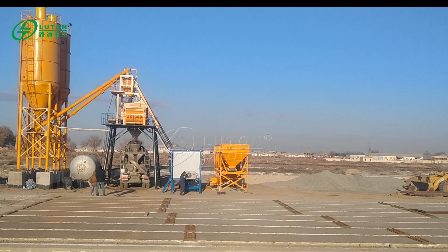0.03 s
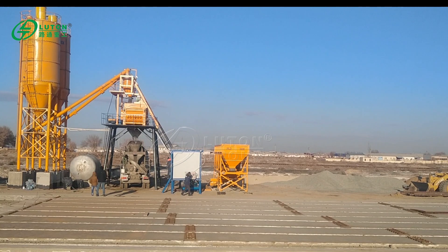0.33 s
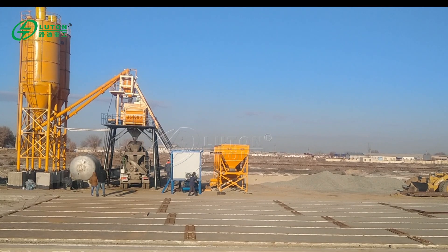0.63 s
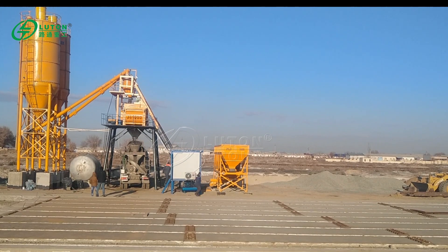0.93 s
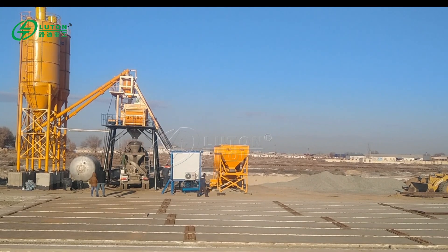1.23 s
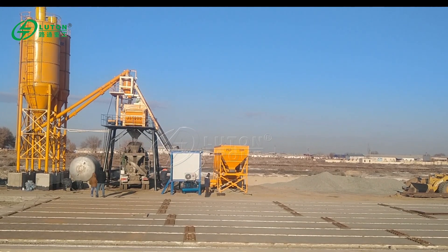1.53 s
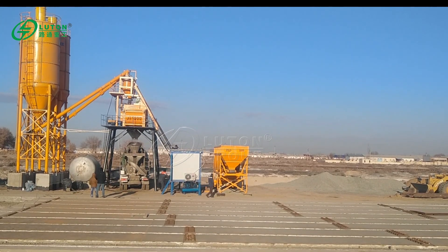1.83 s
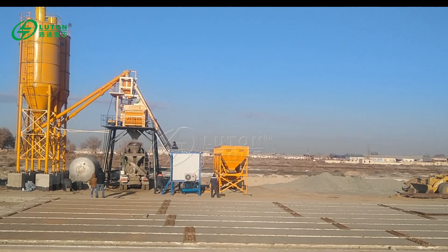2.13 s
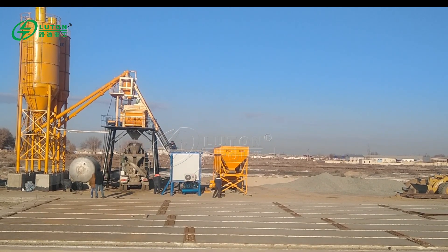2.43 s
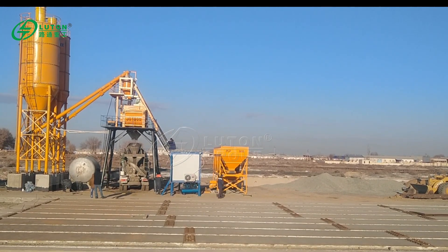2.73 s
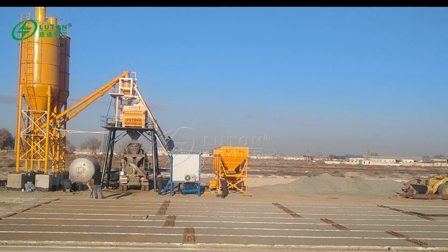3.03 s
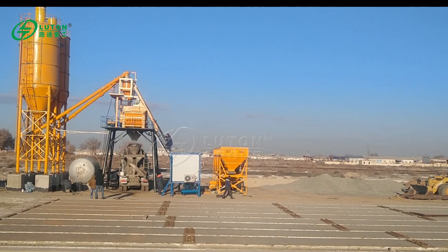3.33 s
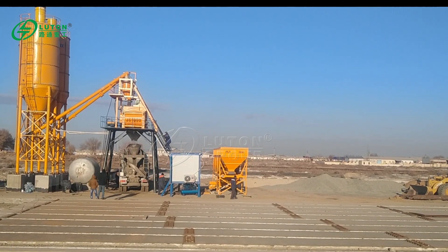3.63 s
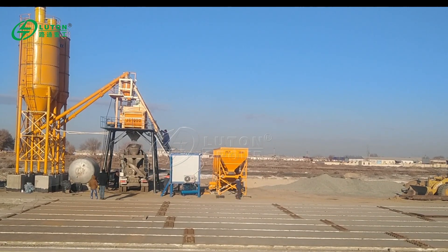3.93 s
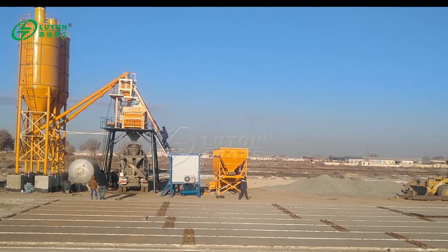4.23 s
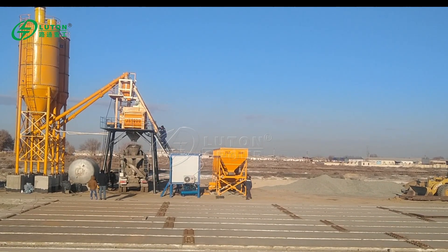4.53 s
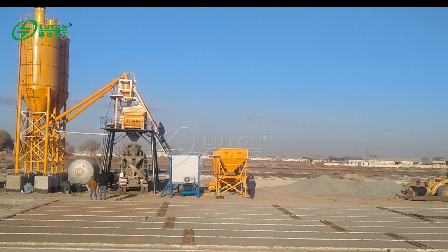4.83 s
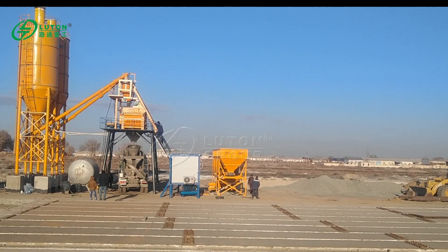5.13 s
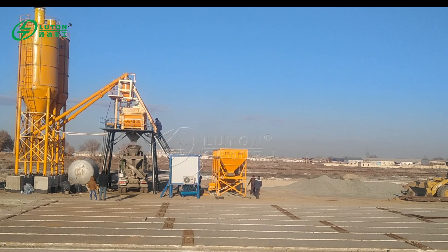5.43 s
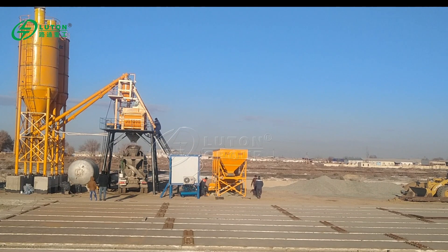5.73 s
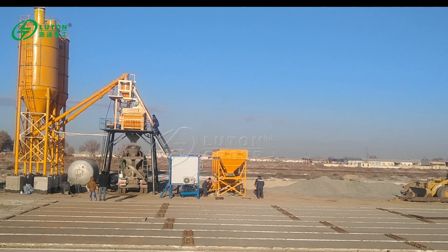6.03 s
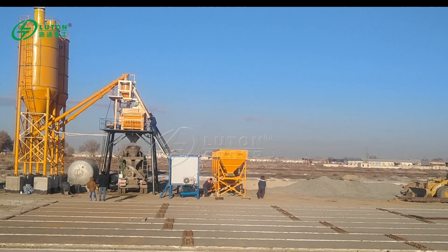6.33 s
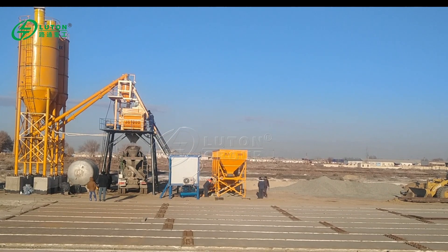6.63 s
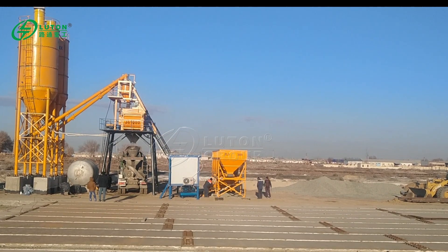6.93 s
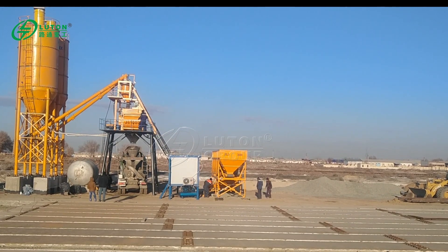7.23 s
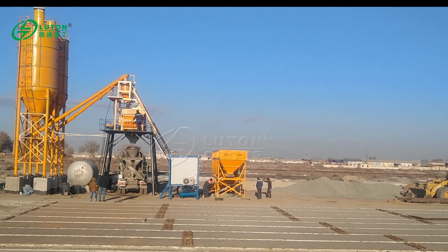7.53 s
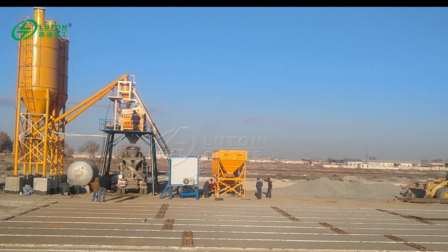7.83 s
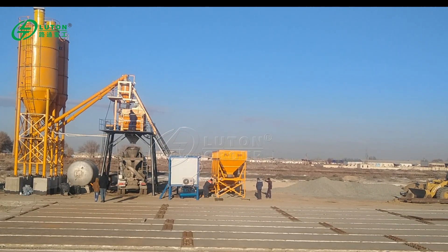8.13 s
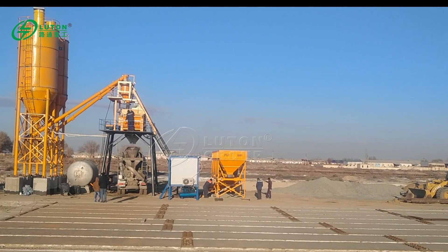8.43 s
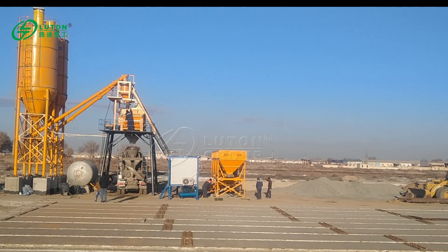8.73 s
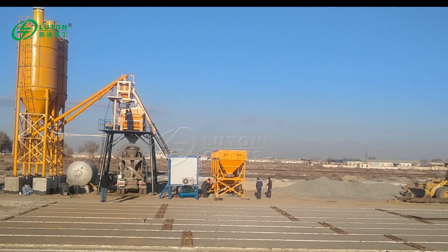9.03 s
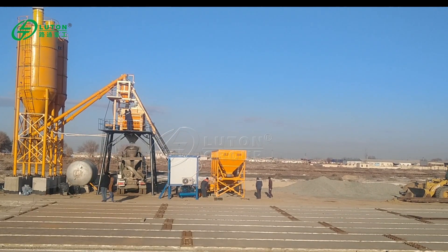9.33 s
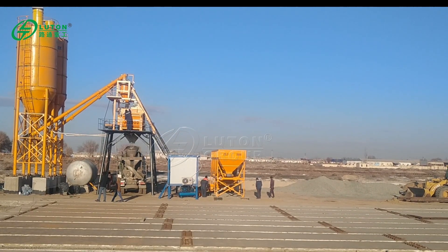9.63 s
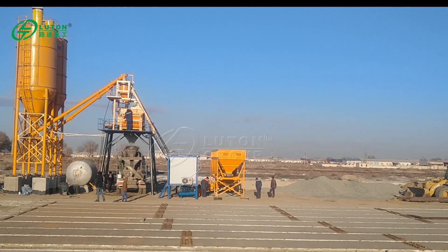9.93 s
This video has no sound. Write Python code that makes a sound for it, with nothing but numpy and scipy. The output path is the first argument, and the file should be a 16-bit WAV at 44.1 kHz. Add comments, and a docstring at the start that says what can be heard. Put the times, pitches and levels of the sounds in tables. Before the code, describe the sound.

Gravel rushes into a steel hopper at an outdoor concrete plant, hissing and rattling as larger stones crack against the plates. It stops briefly, leaving a faint motor whine. A second, brighter pour follows and thins to a ringing, scraping trickle before shutting off. Faint machine whines and a drone remain. Wind rumbles and thumps on the microphone throughout, mostly on the right.

```python
"""Gravel rushes down into a steel hopper twice, at a concrete batching plant across an open yard.
Thousands of tiny impacts take on the hollow ring of the plates, and larger stones crack through.
The second pour thins to a trickle that keeps the hopper ringing and scrapes in surges.
Behind it, electric drives and rubbing parts whine faintly. Gusts buffet the microphone,
their eddies rumbling and thumping hardest on the exposed right port."""
import sys
import numpy as np
from scipy import signal
from scipy.fft import rfft, irfft, next_fast_len
from scipy.io import wavfile
from scipy.ndimage import uniform_filter1d

SR = 44100
rng = np.random.default_rng(int(sys.argv[2]) if len(sys.argv) > 2 else 0)


def pcm_store(signal):
    """Save signal as 16-bit PCM."""
    levels = np.round(np.clip(np.atleast_2d(signal), -1, 1) * 32767)
    wavfile.write(sys.argv[1], SR, levels.astype(np.int16).T)


N = 439677
T = np.arange(N) / SR
FFT_SIZE = next_fast_len(N)
HZ = np.maximum(np.arange(FFT_SIZE // 2 + 1) * SR / FFT_SIZE, 1)

# Colour of the distant yard. Each row: frequency in Hz, left and right in dB.
YARD_COLOUR = [(40, -12.5, -2), (200, 6.5, -9.5), (550, 7.5, -35.5), (1100, -2.5, -43), (1700, -7, -1),
               (3000, -8.5, -9), (5470, -20, -7), (9000, -18, -38), (13500, -16.5, -34),
               (15500, -44.5, -41)]
# Motor tones. Each row: start and end in seconds, pitch in Hz, left and right in dB.
MOTOR_TONES = [(0, 2.6, 2616, -64, -86), (1.6, 2.65, 3688, -53, -81.5), (8.45, 10.1, 3494, -48.5, -87.5),
               (8.7, 10.1, 3445, -54.5, -85), (9.5, 10.1, 4620, -71, -65)]
# Machine whines and squeals, and a single row for the drone under them.
# Each row: start and end in seconds, centre and width in Hz, left and right in dB.
WHINE_BANDS = [(1.6, 2.7, 3440, 80, -56, -78), (1.6, 2.7, 3245, 60, -60, -80),
               (1.6, 2.7, 2330, 150, -66, -64), (1.6, 2.65, 4660, 110, -61, -65),
               (1.6, 2.48, 5215, 80, -68, -76), (1.6, 2.65, 3780, 220, -57, -70),
               (6.56, 6.65, 640, 50, -54, -56), (8.735, 8.772, 1225, 130, -58, -47),
               (8.3, 9.03, 4620, 50, -60.5, -67), (8.45, 10.1, 3410, 140, -60, -80),
               (8.35, 9.75, 3680, 120, -61, -80), (9.19, 9.65, 2620, 36, -65, -82),
               (9.62, 9.88, 3990, 45, -65, -78), (8.45, 9.8, 4870, 75, -68, -76),
               (9.08, 10.1, 982, 62, -47, -43), (9.05, 10.1, 1466, 60, -75, -65),
               (8.4, 10.1, 2325, 130, -75, -69)]
DRONE_BAND = (8.98, 10.1, 760, 210, -58, -47.5)

# Wind strength on the left and right ports. Each row: time in seconds, level in dB.
SHELTERED_BREEZE = [(0.0, -31.5), (0.18, -25), (0.4, -43), (0.95, -23), (1.2, -37), (1.74, -30),
                    (2.05, -67), (2.73, -30), (3.5, -31), (3.7, -55), (4.95, -38), (5.3, -62), (6.55, -60),
                    (6.86, -29.5), (7.48, -23.5), (8.12, -40), (8.35, -57), (8.84, -40.5), (9.94, -29)]
EXPOSED_BREEZE = [(0.0, -26), (0.1, -15), (1.49, -13.5), (1.71, -18), (2.65, -17), (2.92, -11),
                  (3.33, -16.5), (3.43, -12.5), (3.91, -21), (4.59, -16.5), (4.98, -17.5), (5.35, -25.5),
                  (6.46, -26.5), (6.8, -23), (7.46, -21), (7.91, -16.5), (8.27, -19), (8.31, -25.5),
                  (8.71, -23.5), (8.74, -13.5), (9.94, -13.5)]
# Colours of the wind's layers. Each row: frequency in Hz, relative level in dB.
SHELTERED_COLOUR = [(20, -33.5), (50, -7.5), (135, 2.5), (210, -0.5), (300, -11), (420, -18), (600, -37.5),
                    (1000, -64.5)]
EXPOSED_COLOUR = [(20, -38), (50, -23), (90, -13.5), (130, 0.5), (165, 0), (205, -3), (250, -6.5),
                  (340, -13), (450, -38.5), (700, -85.5)]
FLUTTER_COLOUR = [(200, -19), (380, 2.5), (500, -3.5), (650, -13), (800, -26), (1000, -33), (1400, -38.5),
                  (2200, -72.5)]
DRAUGHT_COLOUR = [(20, -18), (70, 4.5), (120, 6.5), (300, -68.5)]
# Thumps of wind. Each row: time and half length in seconds, left, right and extra flutter in dB.
WIND_BUFFETS = [(0.21, 0.018, -40, -24, -1), (0.926, 0.045, -35, -13, -2), (1.273, 0.017, -47, -5, 4),
                (2.215, 0.03, -50.5, -11.5, -1), (2.536, 0.056, -50, -15, 1.5), (3.836, 0.1, -55, -25, 6),
                (3.94, 0.17, -40, -31, 6), (4.364, 0.13, -50, -17.5, 4.5), (5.714, 0.037, -58, -21, -2),
                (6.341, 0.056, -28, -26, 0), (6.924, 0.074, -24.5, -19.5, 6), (7.234, 0.36, -44, -18.5, -8),
                (7.713, 0.037, -29, -11.5, 0), (7.892, 0.042, -43, -10, 0), (8.02, 0.061, -21, -13, 0.5),
                (8.536, 0.063, -24, -18, -4), (8.85, 0.061, -41, -14, 3), (9.028, 0.078, -31.5, -14, 5)]
# Brief holes in the wind. Each row: time and half length in seconds, dip in dB.
WIND_LULLS = [(1.1, 0.071, -6.5), (1.33, 0.08, -6.5), (3.31, 0.029, -9), (6.08, 0.039, -5.5),
              (6.42, 0.14, -10.5), (6.83, 0.019, -18), (7.1, 0.022, -26), (7.33, 0.029, -8.5),
              (7.44, 0.024, -9.5)]
# The hardest eddies to slap the exposed port. Each row: time in seconds, strength in dB.
EDDY_SLAPS = [(2.091, 2.5), (2.178, 2), (2.493, 3.5), (2.545, 5.5), (4.598, 7.5), (8.745, 7), (8.905, 9.5),
              (9.516, 11.5), (9.715, 7.5)]
# Booming vortices. Each row: time and half length in seconds, pitch in Hz, relative level in dB.
VORTEX_BOOMS = [(0.392, 0.079, 162, -15), (0.689, 0.019, 162.5, -10), (1.184, 0.023, 173.8, -8.5),
                (1.443, 0.038, 159, -10.5), (2.836, 0.062, 187, -11), (2.991, 0.051, 167.8, -8.5),
                (4.056, 0.042, 147.5, -13.5), (7.908, 0.034, 161.3, -13.5), (8.846, .04, 194.4, -10),
                (9.074, 0.046, 140.3, -11.5), (9.38, 0.079, 151, -13), (9.57, 0.057, 169.4, -14.5),
                (9.774, 0.072, 140, -12)]
# Deep thuds in the draught. Each row: time in seconds, boost in dB.
DRAUGHT_THUDS = [(.44, 8), (.8, 12), (1.85, 11), (2.34, 7), (4.5, 10.5), (4.98, 11.5), (7.68, 13),
                 (8.02, 7)]

# Scraping surges, stray handfuls and large stones. Each row: time in seconds, relative level in dB.
SCRAPE_SURGES = [(4.51, -49), (4.86, -52), (5.38, -61), (5.55, -66), (5.71, -55), (5.99, -60), (6.18, -61),
                 (6.77, -74), (6.93, -59), (7.33, -59), (7.59, -54), (7.9, -54), (8.03, -55)]
HANDFULS = [(1.755, -35.5), (1.85, -44), (1.93, -46), (2.662, -39.5)]
STONE_HITS = [(.255, -34), (0.432, -30), (.734, -29.5), (0.929, -29), (1.512, -34), (2.712, -33),
              (4.147, -28), (4.5, -32), (4.645, -34), (4.834, -35), (4.939, -32.5), (5.429, -34)]
# Resonances woken by the scrapes, the handfuls and the trickle.
# Each row: centre and width in Hz, left and right in dB.
SCRAPE_RESONANCES = [(1034, 100, 2.5, 4.5), (1394, 45, -20.5, -5), (1690, 81, -23, -10)]
RATTLE_RESONANCES = [(1150, 380, -20, -16.5), (1990, 100, -15, -0.5), (2370, 240, -1.5, -3.5)]
WALL_RESONANCES = [(2065, 72, -49.5, -49), (2123, 38, -52, -47), (2323, 160, -56.5, -55),
                   (2760, 810, -51.5, -81.5), (3366, 360, -42, -61.5), (3676, 300, -46, -69),
                   (4790, 1220, -52.5, -54.5), (7280, 1400, -47, -49.5), (8240, 1800, -48.5, -57),
                   (10400, 4100, -58, -58)]
# The sharpest modes of the steel. Each row: pitch in Hz, relative level in dB.
SINGING_MODES = [(2616, -61), (3365, -53), (3494, -51.5), (3692, -52), (4194, -62.5), (4613, -61),
                 (4689, -61)]
# Colours of the two pours. Each row: frequency in Hz, left and right in dB.
FIRST_POUR_COLOUR = [(300, -34.5, -8.5), (600, -27.5, -6.5), (1050, -6, -6.5), (1390, -9.5, -10.5),
                     (1700, -15, -9.5), (2370, -6, -4.5), (2750, -17, -19.5), (3490, -2.5, -17.5),
                     (4240, -14, -13.5), (6950, -25.5, -21), (7860, -16.5, -18.5), (11600, -28, -29),
                     (12500, -28, -35), (15000, -50.5, -51.5)]
SECOND_POUR_COLOUR = [(300, -24.5, -35.5), (640, -22, -3.5), (1043, -4.5, -4), (1650, -11, -5),
                      (2280, 0.5, 1.5), (2840, -4.5, -7.5), (3480, 7, -6.5), (3900, -3, -4.5),
                      (5700, -9.5, -11.5), (7350, -1, -4), (9600, -14, -13), (12300, -12.5, -17.5),
                      (13950, -17.5, -23.5), (15300, -28.5, -78)]
# Clumps that swell or choke a pour. Each row: time and half length in seconds, boost or dip in dB.
FLOW_CLUMPS = [(.03, 0.15, -3.5), (.24, 0.097, 1), (.365, 0.045, -5.5), (.95, 0.033, 0.5),
               (1.12, 0.067, -5.5), (1.53, 0.076, 1.5), (1.725, 0.012, -9), (2.95, 0.062, 4.5),
               (4.22, 0.035, 6.5), (5.17, .16, -4)]

# The second pour: its gate, the level it thins towards and its fade once shut off.
GATE_OPEN_S, GATE_SHUT_S = 2.662, 8.28
TRICKLE_DB, SHUT_DB_PER_S = -63, 114


def from_db(db):
    """Decibels to gain."""
    return 10 ** (np.asarray(db) / 20)


def stereo_gain(left_db, right_db):
    """One gain for each ear."""
    return from_db([[left_db], [right_db]])


def unit_power(x):
    """Scale to an RMS of 1."""
    return x / np.sqrt(np.mean(x ** 2) + 1e-20)


def since(s):
    """Seconds gone by since a moment; zero before it."""
    return np.maximum(T - s, 0)


def between(start, end):
    """A soft gate from start to end; short sounds get quicker fades."""
    fade_s = min((end - start) / 2, .15)
    return np.clip(np.minimum(T - start, end - T) / fade_s + .5, 0, 1)


def bump(s, half_length_s):
    """A smooth swell of height 1 around a moment."""
    return np.exp(-np.minimum(((T - s) / half_length_s) ** 2, 50))


def swells(rows):
    """Gain that briefly rises or sinks at each (s, half length s, dB)."""
    return from_db(sum(db * bump(s, length) for s, length, db in rows))


def fader(rows):
    """Gain that rides through (s, dB) points."""
    times, levels_db = np.transpose(rows)
    return from_db(np.interp(T, times, levels_db))


def blows(rows):
    """One click for each (s, dB)."""
    clicks = np.zeros(N)
    for s, db in rows:
        clicks[round(s * SR)] = from_db(db)
    return clicks


def decay(clicks, t60):
    """Each click starts an envelope that falls 60 dB in t60 seconds."""
    return signal.lfilter([1], [1, -from_db(-60 / (t60 * SR))], clicks + 1e-18)


def drift(rate_hz):
    """Smooth random modulation with a spread of 1."""
    hop, warm_up = 40, 2000
    pole = np.exp(-2 * np.pi * rate_hz * hop / SR)
    noise = rng.standard_normal(N // hop + warm_up + 2)
    slow = signal.lfilter([1], [1, -2 * pole, pole * pole], noise)[warm_up:]
    return np.interp(np.arange(N) / hop, np.arange(len(slow)), unit_power(slow))


def cut(x, order, hz, kind):
    """A Butterworth low-pass or high-pass."""
    return signal.sosfilt(signal.butter(order, hz, kind, fs=SR, output="sos"), x)


def equalise(x, gain):
    """Apply a gain for each frequency in HZ."""
    return irfft(rfft(x, FFT_SIZE) * gain, FFT_SIZE)[:, :N]


def coloured(x, colour):
    """Shape x with an EQ curve (one dB column, or one per ear); unit power."""
    hz, *columns = np.transpose(colour)
    gain = from_db([np.interp(np.log(HZ), np.log(hz), db) for db in columns])
    return unit_power(equalise(x, gain))


def resonate(x, modes):
    """Pass a white stereo drive through steep-sided resonances, each with its level in each ear."""
    power = 0
    for hz, width, left_db, right_db in modes:
        shape = unit_power((1 + 2 * ((HZ - hz) / width) ** 2) ** -1.5)
        power = power + (stereo_gain(left_db, right_db) * shape) ** 2
    return equalise(x, np.sqrt(power))


def grains(per_s, spread_db=0.0):
    """Random impacts, unrelated in strength and sign at each ear; spread_db makes them more uneven."""
    hits = rng.random(N) < per_s / SR
    sizes = from_db(spread_db * np.minimum(rng.exponential(1, N), 5))
    return unit_power(hits * sizes * rng.standard_normal((2, N)))


def yard(level_db=-66.5):
    """The distant yard lays a faint, steady bed of noise."""
    return from_db(level_db) * coloured(rng.standard_normal((2, N)), YARD_COLOUR)


def drives(waver_hz=4.0, fading_db=1.0):
    """Electric motors sing steady tones that waver slightly together; a close pair beats in a buzz."""
    out, detune_hz = 0, waver_hz * drift(11)
    for start, end, hz, left_db, right_db in MOTOR_TONES:
        phase = 2 * np.pi * np.cumsum(hz + detune_hz) / SR
        gain = stereo_gain(left_db, right_db) * from_db(-fading_db * drift(3.1))
        out = out + between(start, end) * gain * np.sqrt(2) * np.sin(phase)
    return out


def whines(waver_db=3.5, drone_waver_db=2.0, grating_db=2.0):
    """Rubbing parts ring in narrow bands that grate as they catch and slip; a broad drone joins late."""
    friction = rng.standard_normal((2, N))
    bands = sum(between(start, end) * resonate(friction, [mode]) * from_db(waver_db * drift(15))
                for start, end, *mode in WHINE_BANDS)
    grating = unit_power(from_db(grating_db * drift(70)))
    start, end, *mode = DRONE_BAND
    drone = between(start, end) * resonate(friction, [mode]) * from_db(drone_waver_db * drift(4.6))
    return bands * grating + drone


def wind_strength(left_gusty_db=1.0, right_gusty_db=1.8):
    """The breeze on each port, with quick random gusting, single buffets and lulls."""
    breeze = np.array([fader(SHELTERED_BREEZE) * from_db(left_gusty_db * drift(6.3)),
                       fader(EXPOSED_BREEZE) * from_db(right_gusty_db * drift(16))])
    buffet_power = sum((stereo_gain(left_db, right_db) * bump(s, length)) ** 2
                       for s, length, left_db, right_db, _ in WIND_BUFFETS)
    return np.sqrt(breeze ** 2 + buffet_power) * swells(WIND_LULLS)


def eddies(colour, evenness, lumpy_db):
    """Turbulence on one port: a rumble, compressed by evenness (0 to 1) and broken into quick lumps."""
    rumble = coloured(rng.standard_normal(N), colour)[0]
    envelope = np.sqrt(np.abs(uniform_filter1d(rumble ** 2, size=3000)) + 1e-9)
    return unit_power(rumble / envelope ** evenness * from_db(lumpy_db * drift(29)))


def slaps(lesser_per_s=7.6, lesser_db=-4, t60=0.024):
    """Gain that jumps as an eddy slaps the port and falls straight back; lesser slaps come at random."""
    lesser = from_db(lesser_db) * (rng.random(N) < lesser_per_s / SR) * rng.random(N)
    return 1 + decay(blows(EDDY_SLAPS) + lesser, t60)


def flutter(strength, level_db=-15, onset_db=-19, steepness=2.4, top_hz=830):
    """Strong gusts flap in the low mids; below the onset strength the flapping drops away steeply."""
    onset = np.minimum(strength / from_db(onset_db), 1) ** steepness
    accents = swells([(s, length, extra_db) for s, length, _, _, extra_db in WIND_BUFFETS])
    flapping = slaps() * eddies(FLUTTER_COLOUR, evenness=0.43, lumpy_db=1.5)
    return strength * from_db(level_db) * onset * accents * unit_power(cut(flapping, 9, top_hz, "low"))


def draught(level_db=-30.5, thud_half_length_s=0.07):
    """A low stir of air that swells into deep thuds and sinks in the lulls."""
    thuds = swells([(s, thud_half_length_s, db) for s, db in DRAUGHT_THUDS])
    air = coloured(rng.standard_normal(N), DRAUGHT_COLOUR)[0]
    return from_db(level_db) * thuds * swells(WIND_LULLS) * air


def vortices(trim_db=-0.5, glide=0.05, rough_db=1.5):
    """Each vortex shed at the port is a short, nearly pure boom whose pitch wanders a little."""
    warped_s = np.cumsum(1 + glide * drift(8)) / SR
    booms = sum(from_db(db) * bump(s, length) * np.sin(2 * np.pi * hz * warped_s)
                for s, length, hz, db in VORTEX_BOOMS)
    return np.sqrt(2) * booms * from_db(trim_db + rough_db * drift(30))


def wind(right_trim_db=-1.0):
    """Each port rumbles with its own eddies; the exposed right one also flutters, thuds and booms."""
    sheltered, exposed = wind_strength()
    left = sheltered * eddies(SHELTERED_COLOUR, evenness=0.37, lumpy_db=2.5)
    right = exposed * eddies(EXPOSED_COLOUR, evenness=1.0, lumpy_db=2.0) * from_db(right_trim_db)
    return np.array([left, right + flutter(exposed) + draught() + vortices()])


def first_flow(start_db=-30, sag_db_per_s=3, close_s=1.585, fade_db_per_s2=122, surging_db=1.08):
    """Level of a clumpy stream that sags slowly, then falls ever faster as the gate closes."""
    closing_db = fade_db_per_s2 * np.minimum(since(close_s), 1) ** 2
    stream_db = start_db - sag_db_per_s * T - closing_db + surging_db * drift(23)
    return from_db(stream_db) * swells(FLOW_CLUMPS)


def second_flow(full_db=-27.5, full_until_s=3.61, thinning_s=1.4, opening_db=-24, swell_s=0.082,
                attack_s=0.011, leak_db=-55.5, leak_db_per_s=41):
    """Level of a stream that swells, holds and thins to a trickle until the gate shuts."""
    attack = np.minimum(since(GATE_OPEN_S) / attack_s, 1)
    swell_db = opening_db * np.exp(-since(GATE_OPEN_S) / swell_s)
    stream_db = TRICKLE_DB + (full_db - TRICKLE_DB) * np.exp(-since(full_until_s) / thinning_s)
    stream = attack * from_db(stream_db + swell_db - SHUT_DB_PER_S * since(GATE_SHUT_S))
    leak = from_db(leak_db - leak_db_per_s * np.abs(T - GATE_OPEN_S))  # stones slip past the moving gate
    return stream * swells(FLOW_CLUMPS) + leak


def ringing(level_db=-1, follow=0.11, build_s=0.16, dribble_db=-9, dribble_db_per_s=35):
    """Level of the steel's ring, far more even than the flow feeding it; a dribble outlasts the gate."""
    held_flow = np.interp(np.minimum(T, GATE_SHUT_S), T, second_flow()) / from_db(TRICKLE_DB)
    build = np.minimum(since(GATE_OPEN_S) / build_s, 1)
    shut_for_s = since(GATE_SHUT_S)
    release_db = np.maximum(-SHUT_DB_PER_S * shut_for_s, dribble_db - dribble_db_per_s * shut_for_s)
    return held_flow ** follow * build * from_db(level_db + release_db)


def steel(x, ripple_db=3.0, mode_width_hz=28):
    """The many close modes of the steel plates give what lands on them a fine, hollow ring."""
    heights = np.clip(rng.standard_normal(4000), -2, 2)
    ripple = np.interp(HZ / mode_width_hz, np.arange(len(heights)), heights)
    return equalise(x, unit_power(from_db(ripple_db * ripple)))


def scrapes(half_length_s=0.033, bed_db=-66, trim_db=-2.5, chatter_db=3.5, pitch_wander=0.04):
    """As the stream thins, gravel slides in short, chattering surges, each at a slightly new pitch."""
    surges = sum(from_db(db + trim_db) * bump(s, half_length_s) for s, db in SCRAPE_SURGES)
    friction = rng.standard_normal((2, N))
    rub = sum(resonate(friction, [mode]) * from_db(chatter_db * drift(9.2))
              for mode in SCRAPE_RESONANCES)
    warped_s = np.cumsum(1 + pitch_wander * drift(5)) / SR
    bent_rub = np.array([np.interp(warped_s, T, ear) for ear in rub])
    return (surges + from_db(bed_db) * ringing()) * bent_rub


def rattles(t60=0.44):
    """Between the pours, stray handfuls land as short, dying patters on the steel."""
    envelope = uniform_filter1d(decay(blows(HANDFULS), t60), size=600)
    return envelope * resonate(grains(per_s=810, spread_db=1.0), RATTLE_RESONANCES)


def singing(width_hz=10, right_db=-15, fading_db=4.0):
    """The trickle keeps lightly damped modes singing, mostly on the left; each swells on its own."""
    trickle = rng.standard_normal((2, N))
    modes = sum(resonate(trickle, [(hz, width_hz, db, db + right_db)]) * from_db(fading_db * drift(2))
                for hz, db in SINGING_MODES)
    return ringing() * modes


def hopper(wander_db=1.34, flicker_db=1.8, broad_hz=300):
    """The trickle rings the walls: broad bands are clusters of modes, narrow ones die with the gate."""
    out, trickle = 0, grains(per_s=8000)
    clustered = steel(trickle)
    gate = from_db(-SHUT_DB_PER_S * since(GATE_SHUT_S + 0.042))
    for mode in WALL_RESONANCES:
        width_hz = mode[1]
        drive, gain = (clustered, 1) if width_hz > broad_hz else (trickle, gate)
        drive = np.roll(drive, rng.integers(N), axis=1)  # each resonance gets its own patter
        out = out + gain * resonate(drive, [mode]) * from_db(wander_db * drift(28))
    return ringing() * out * from_db(flicker_db * drift(7.7))


def stones(crash_t60=0.24, crack_db=-2, crack_t60=0.017):
    """A large stone gives a blunt crack and a quick crash in its pour's colour, brighter in the second."""
    hits = blows(STONE_HITS)
    envelope = decay(hits, crash_t60) + from_db(crack_db) * decay(hits, crack_t60)
    noise = rng.standard_normal((2, N))
    dull = coloured(noise, FIRST_POUR_COLOUR)
    bright = cut(coloured(noise, SECOND_POUR_COLOUR), 2, 2600, "high")
    return uniform_filter1d(envelope, size=50) * np.where(T < GATE_OPEN_S, dull, bright)


def gravel(colour, fine_surge_db, coarse_surge_db=1.0, grit_db=-9):
    """Thousands of impacts a second: coarse stones rattle in clumps, fine ones hiss and tick above."""
    impacts = grains(per_s=10000) + from_db(grit_db) * grains(per_s=360, spread_db=1.0)
    fine = rush = coloured(impacts, colour)
    for hz in np.geomspace(700, 2800, 5):  # peel away the lows and mids
        fine = fine - signal.sosfiltfilt(signal.butter(3, hz, fs=SR, output="sos"), fine)
    clumps = drift(22)
    coarse = (rush - fine) * from_db(coarse_surge_db * (clumps + drift(21)))
    return unit_power(coarse + fine * from_db(fine_surge_db * clumps))


def pours(sand_db=-42, sand_hz=8000):
    """Two loads of gravel rush onto steel; midway through the first, sand adds an even, high hiss."""
    first = gravel(FIRST_POUR_COLOUR, fine_surge_db=0.0) * first_flow()
    hiss = cut(grains(per_s=12000, spread_db=1.5), 2, sand_hz, "high")
    sand = between(0.76, 1.52) * from_db(sand_db) * stereo_gain(3, -3) * hiss
    second = gravel(SECOND_POUR_COLOUR, fine_surge_db=1.36) * second_flow()
    return steel(first + sand + second)


def scene():
    """Yard, machinery and wind, with the gravel and its ringing hopper on top."""
    background = yard() + drives() + whines() + wind()
    return background + scrapes() + rattles() + singing() + hopper() + stones() + pours()


def record(dry, ceiling=1.2, cutoff_hz=15650):
    """Soft saturation rounds off the strongest buffets, and the top is cut steeply."""
    rounded = ceiling * np.tanh(dry / ceiling)
    return signal.sosfilt(signal.ellip(10, .2, 80, cutoff_hz, fs=SR, output="sos"), rounded)


dry = scene()
out = record(dry)
pcm_store(out)
```